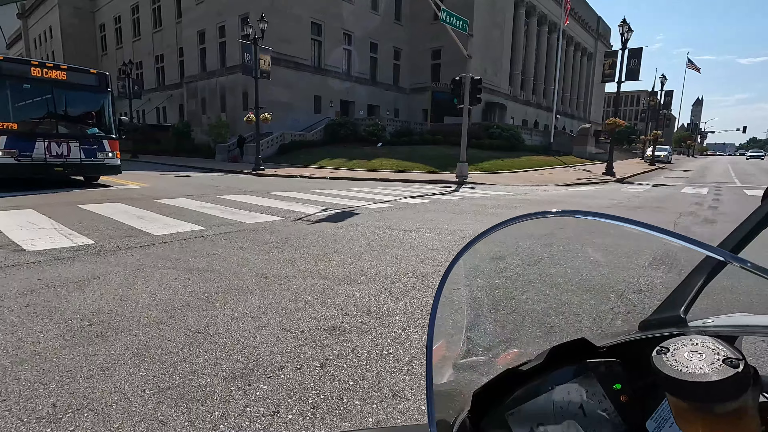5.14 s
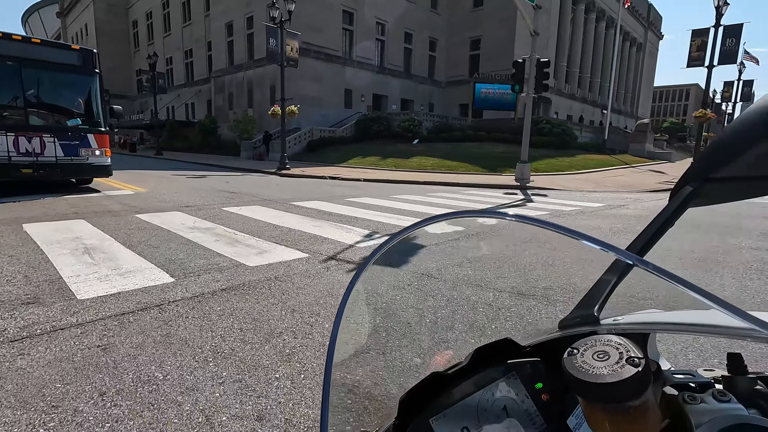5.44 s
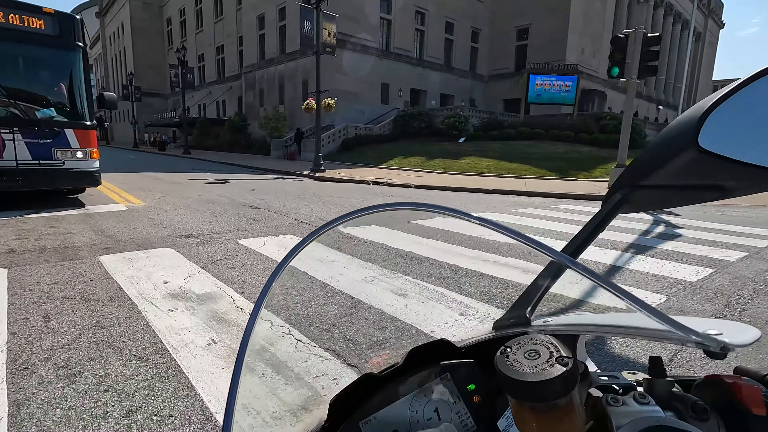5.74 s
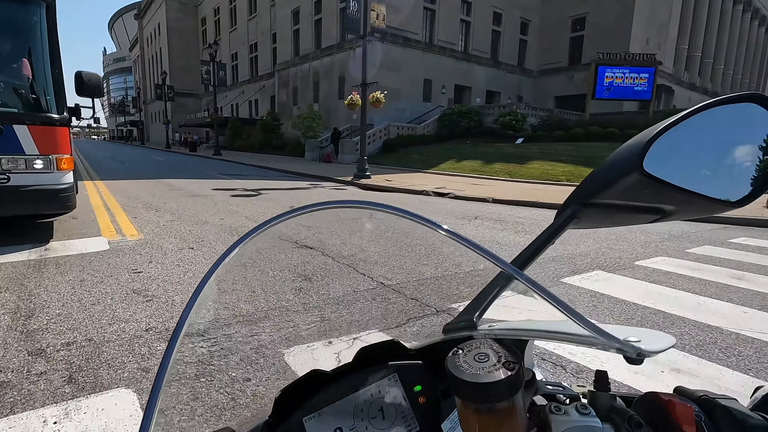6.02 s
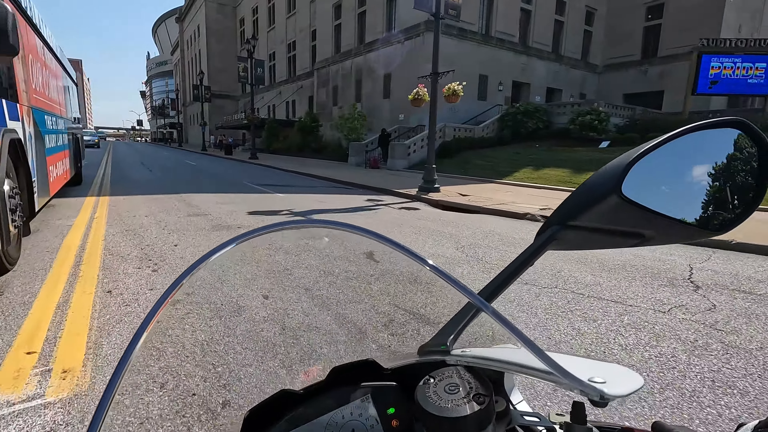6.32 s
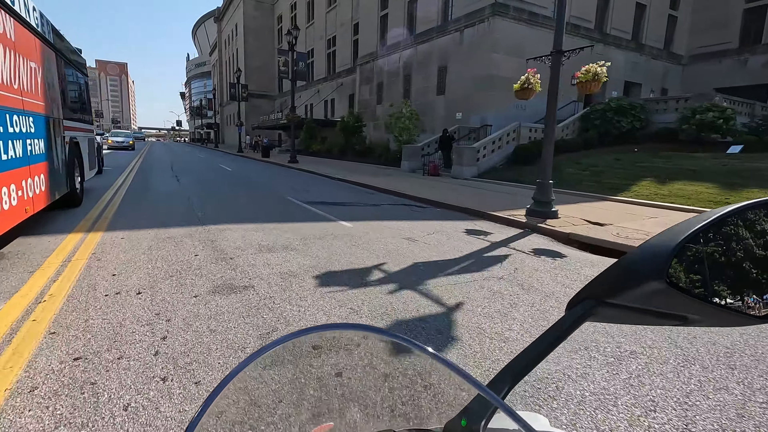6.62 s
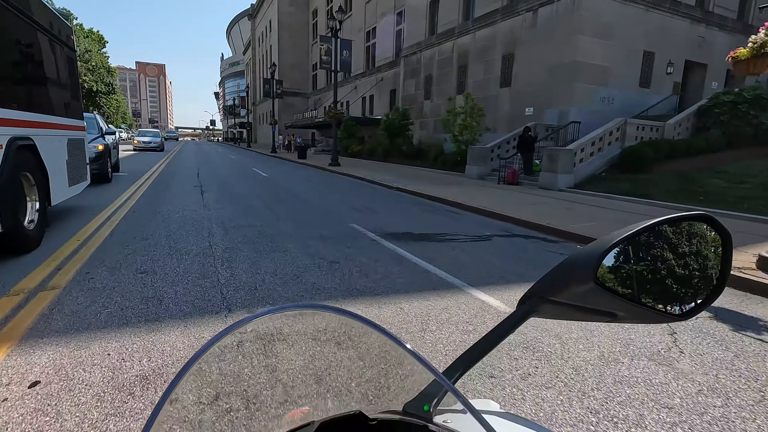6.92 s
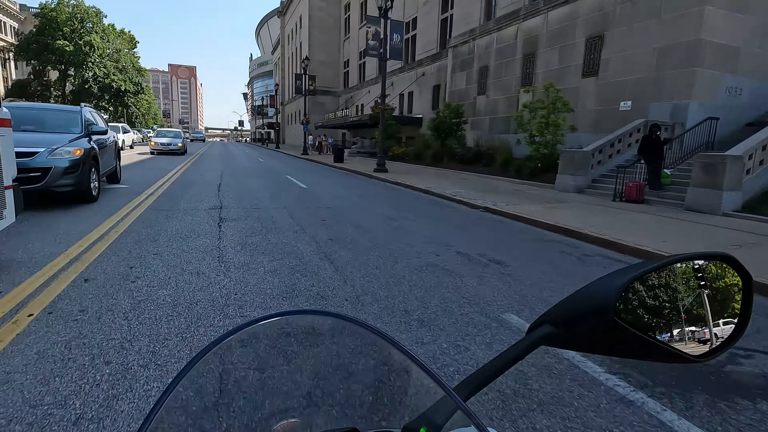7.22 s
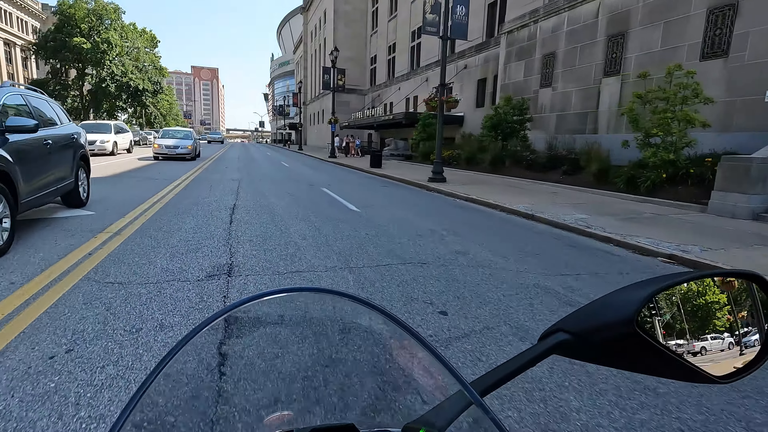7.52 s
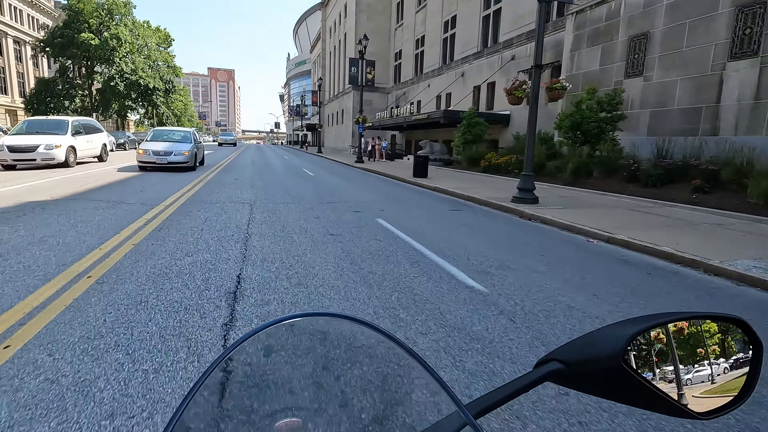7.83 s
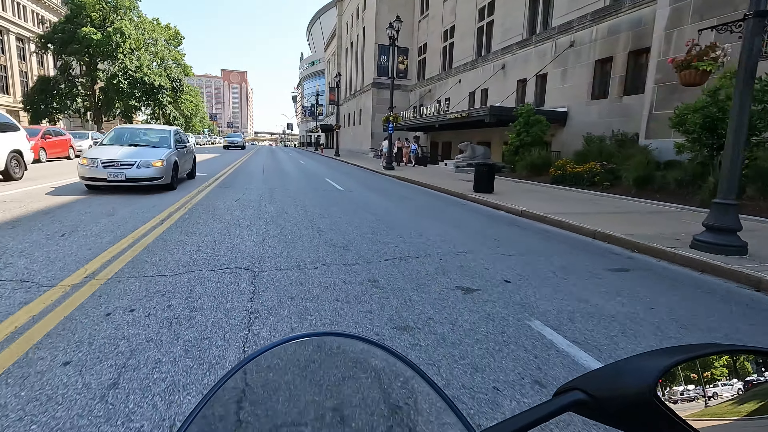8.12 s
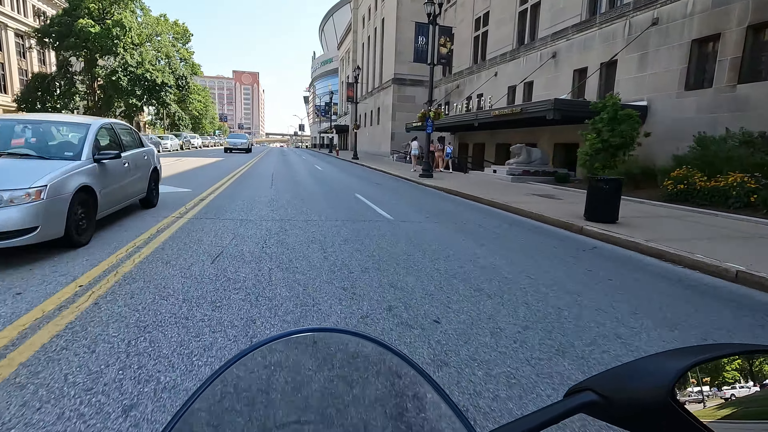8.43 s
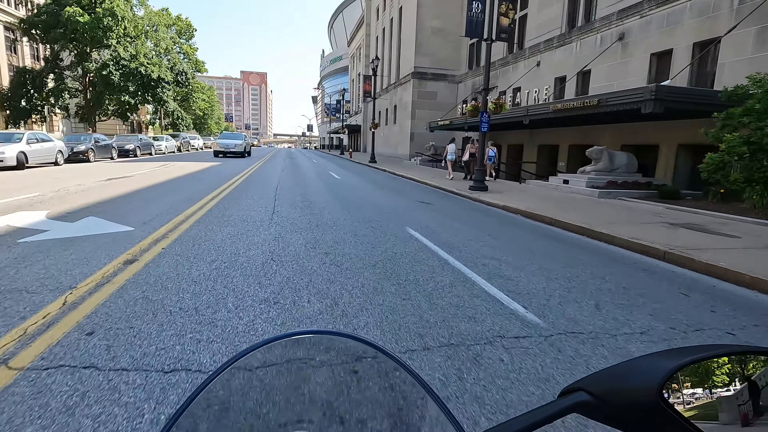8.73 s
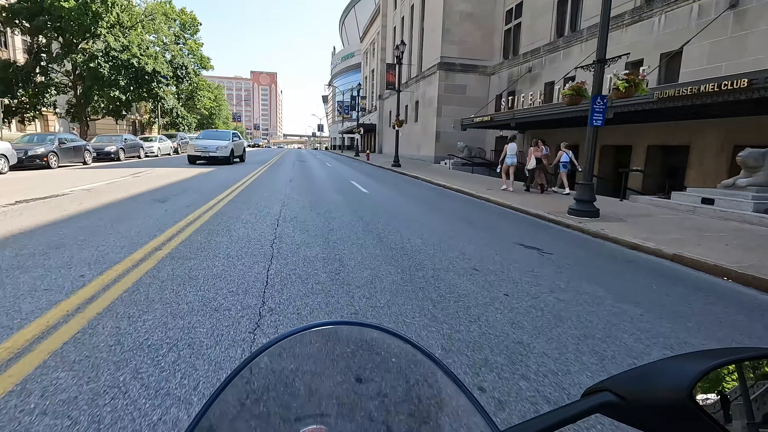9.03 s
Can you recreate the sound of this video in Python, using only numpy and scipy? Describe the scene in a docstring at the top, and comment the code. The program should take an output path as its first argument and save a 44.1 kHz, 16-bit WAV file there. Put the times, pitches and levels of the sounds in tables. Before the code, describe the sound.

From the seat of a motorcycle in city streets, the engine chugs at idle with a light mechanical chatter. The throttle opens and the throb becomes a higher, wavering drone. The bike creeps off and gathers speed, its growl rising as wind and tyre noise build beneath it. The pitch drops suddenly at a single gear change, then the engine pulls steadily again.

```python
"""A four-cylinder motorcycle with an uneven beat, heard from the rider's seat.
It idles, pulls away on a slipping clutch, gathers speed, shifts up once and drones on.
Puffs of gas make the exhaust pipe and airbox (the air intake's chamber) ring, while the valves
clatter, chirp and hiss in step. Wind and tyre roar grow with road speed.
One small tick comes from the handlebar near the start."""
import sys
import numpy as np
from scipy.fft import rfft, irfft, next_fast_len
from scipy.io import wavfile
from scipy.ndimage import uniform_filter1d, minimum_filter1d, map_coordinates

SR = 44100
rng = np.random.default_rng(int(sys.argv[2]) if len(sys.argv) > 2 else 0)


def log_audio(samples):
    """Write samples as a 16-bit WAV file to the path given in sys.argv[1]."""
    # one column per channel
    frames = np.atleast_2d(samples).T
    # limit to full scale, then quantise
    limited = np.clip(frames, -1, 1)
    pcm = np.round(limited * 32767).astype(np.int16)
    wavfile.write(sys.argv[1], SR, pcm)


N = 399987


def amp(db):
    """Turn decibels into a gain to multiply by."""
    return 10 ** (np.asarray(db) / 20)


def clock():
    """The time of every sample, in seconds."""
    return np.arange(N) / SR


def curve(rows):
    """Join (time, value) points with straight lines."""
    return np.interp(clock(), *np.transpose(rows))


def ramp(x, start, end):
    """0 at start, 1 at end, straight in between and flat outside."""
    return np.clip((x - start) / (end - start), 0, 1)


def steady(x):
    """Hold the average level at 1 but keep the quick beats."""
    size = SR // 6
    power = uniform_filter1d(uniform_filter1d(x * x, size), size)
    return x / np.sqrt(np.abs(power) + 1e-20)


def wobble(per_s):
    """A smooth curve through per_s random values a second."""
    return map_coordinates(rng.standard_normal(int(N * per_s / SR) + 4), [clock() * per_s])


def filtered(x, response):
    """Multiply each frequency in x by response(hz)."""
    size = next_fast_len(N + SR // 2)
    return irfft(rfft(x, size) * response(np.fft.rfftfreq(size, 1 / SR)), size)[:N]


def coloured(x, points):
    """Shape the tone of x with (pitch_hz, level_db) points, then steady its level."""
    pitch_hz, level_db = np.transpose(points)
    shape = lambda hz: amp(np.interp(np.log(hz + 1), np.log(pitch_hz), level_db, right=-120))
    return steady(filtered(x, shape))


def ring(x, notes, soft_hz):
    """Pulses, dulled above soft_hz, ring a body's natural notes at a steady level."""
    def response(hz):
        body = sum(gain * 1j * hz * width / (pitch ** 2 - hz ** 2 + 1j * hz * width)
                   for pitch, width, gain in notes)
        return body / (1 + 1j * hz / soft_hz) ** 2 / (1 + (hz / (2 * soft_hz)) ** 4)
    return steady(filtered(x, response))


def pulses(cycles, places, sizes):
    """A click each time the engine's count of cycles reaches one of the places."""
    at = np.interp(places.ravel(), cycles, np.arange(N))
    sizes = sizes.ravel() * (at > 0) * (at < N - 1)
    i = at.astype(int)
    late = at - i  # each click is shared between two samples
    return (np.bincount(i, sizes * (1 - late), N + 1) + np.bincount(i + 1, sizes * late, N + 1))[:N]


def chatter(cycles, noise_share, count=96, drift_cycles=36):
    """Tiny clicks that return every cycle, slowly changing in strength, mixed with plain noise."""
    places = np.arange(int(cycles[-1]) + 1)[:, None] + rng.random(count)
    strengths = uniform_filter1d(rng.standard_normal(places.shape), drift_cycles, axis=0)
    clicks = steady(pulses(cycles, places, strengths))
    return np.sqrt(1 - noise_share) * clicks + np.sqrt(noise_share) * rng.standard_normal(N)


def road_speed(start_s=4.3, gather_s=2.73):
    """0 standing still, 1 at full pace; the bike creeps at first."""
    return ramp(clock(), start_s, start_s + gather_s) ** 1.4


# The wind's low rumble: pitch_hz, level_db
WIND_TONE = [(8, -19), (28, -5), (55, -8.5), (110, -12.5), (250, -14), (500, -22.5), (1500, -80.5)]


def wind(breeze_db=-29.5, headwind_db=8, flutter_db=-1.8):
    """Air tumbles round the windscreen, buffeting harder as the bike speeds up."""
    level_db = breeze_db + headwind_db * road_speed() ** 2 + flutter_db * wobble(12)
    return amp(level_db) * coloured(rng.standard_normal(N), WIND_TONE)


# Tyres on asphalt: pitch_hz, level_db
TYRE_TONE = [(300, -8.5), (600, -6), (900, 1.5), (1150, 1.5), (1450, -11.5), (2000, -12.5), (2900, -12),
             (4000, -25.5), (6000, -32), (9000, -44), (15000, -52)]


def tyres(full_pace_db=-30.5):
    """The rolling tyres roar louder with road speed."""
    return amp(full_pace_db) * road_speed() * coloured(rng.standard_normal(N), TYRE_TONE)


def handlebar_tick(start_s=.136, level_db=-39, fade_s=0.056):
    """One small bright tick that dies away quickly."""
    age_s = clock() - start_s
    tone = [(2500, -43), (4000, -3.0), (5500, -13.0), (8400, -11.0), (11000, -17.5), (15500, -27)]
    fade = (age_s > 0) * amp(level_db - 60 * np.abs(age_s) / fade_s)
    return fade * coloured(rng.standard_normal(N), tone)


# The notes of the clutch plates: pitch_hz, width_hz, gain
CLUTCH_NOTES = [(911, 55, 0.97), (1004, 40, 0.37), (1706, 78, .42), (3296, 120, 0.16)]


def clutch(cycles, valve_force, start_s=4.35, end_s=6.8, fade_s=.4, level_db=-33.5):
    """While the clutch slips, the engine's knocks ring its plates."""
    slip = ramp(clock(), start_s, start_s + fade_s) * ramp(clock(), end_s, end_s - fade_s)
    knocks = chatter(cycles, noise_share=0.2) * (0.92 + valve_force)
    return amp(level_db) * slip * ring(knocks, CLUTCH_NOTES, soft_hz=6000)


# The valve movements in one engine cycle:
# place_cycles, length_s, revving_size, idle_size, revving_pitch_ratio, idle_pitch_ratio
VALVE_MOVES = [(.2, 0.0035, .15, 1.14, 0.85, 1.485), (0.308, 0.0076, 0.64, 0.43, 1.015, 1.5),
               (0.678, .003, 1, 0.084, 1.03, 0.35), (0.819, 0.0037, 1, 1.5, 1.06, 1.014)]


def valve_moves(cycles, cycles_per_s, above_idle):
    """Each valve movement is a short swell, once a cycle, with its own pitch ratio."""
    for place, length_s, rev_size, idle_size, rev_ratio, idle_ratio in VALVE_MOVES:
        offset_s = ((cycles - place + .5) % 1 - .5) / cycles_per_s  # time from the swell's middle
        size = rev_size * above_idle + idle_size * (1 - above_idle)
        swell = size * np.exp(-(offset_s / length_s) ** 2)
        yield offset_s, swell, rev_ratio * above_idle + idle_ratio * (1 - above_idle)


def valve_chirps(moves, above_idle, level_db, idle_hz=1130, revving_hz=1050):
    """Each valve lets through a few milliseconds of whistling air."""
    base_hz = idle_hz + above_idle * (revving_hz - idle_hz)
    whistle = sum(swell * np.sin(2 * np.pi * base_hz * ratio * offset_s + 0.56 * wobble(450))
                  for offset_s, swell, ratio in moves)
    return amp(level_db + 1.5 * wobble(25)) * whistle


# The engine's high hiss: pitch_hz, level_db
HISS_TONE = [(1400, -23), (1900, 0), (2350, -1), (2600, -2.5), (3120, -2), (3600, -10), (5000, -17),
             (5650, -15), (6300, -19), (8400, -25.5), (10000, -31.5), (12000, -37), (15500, -36.5)]


def valve_hiss(cycles, valve_force, level_db):
    """A hiss that swells with every valve movement."""
    return amp(level_db) * coloured(chatter(cycles, noise_share=0.76) * (1.6 + valve_force), HISS_TONE)


# The engine's metal case, pulling and idling: pitch_hz, level_db
PULLING_CASE_TONE = [(600, -17), (780, -7.5), (900, -2.5), (1100, -1.5), (1400, -11), (1580, -5),
                     (1730, -2.5), (1880, -18.5), (2300, -33)]
IDLE_CASE_TONE = [(440, -34), (750, -12), (817, -15.5), (870, -7.5), (1010, -11.5), (1080, -5), (1120, -7),
                  (1350, -16), (1730, -12), (1950, -31), (2200, -26), (2860, -39), (4840, -120)]


def valve_clatter(cycles, valve_force, pulling, level_db):
    """The valves' knocks sound through the engine's case."""
    knocks = chatter(cycles, noise_share=0.36) * (1 + valve_force)
    pull = np.sqrt(pulling) * coloured(knocks, PULLING_CASE_TONE)
    idle = np.sqrt(1 - pulling) * coloured(knocks, IDLE_CASE_TONE)
    return amp(level_db) * (pull + idle)


# The engine's rough edge: pitch_hz, level_db
RASP_TONE = [(550, -30.5), (660, -4), (735, 0), (820, -6.5), (1000, -23)]


def rasp(cycles, level_db):
    """A narrow, rough buzz in step with the engine."""
    return amp(level_db) * coloured(chatter(cycles, noise_share=0.23), RASP_TONE)


# The growl of air being sucked in: pitch_hz, level_db
INTAKE_TONE = [(330, -20.5), (430, 3), (480, -4.5), (540, 0), (600, 1), (660, -14), (800, -34.5)]


def intake(cycles, throb_db, growl_db):
    """The airbox sucks hardest once a cycle, making a deep throb and a pulsing growl."""
    suck = np.cos(2 * np.pi * (cycles - .45))
    throb = amp(throb_db + 1.8 * wobble(6.6)) * steady(suck)
    air = chatter(cycles, noise_share=0.11) * (1 + 0.44 * suck)
    return throb + amp(growl_db) * coloured(air, INTAKE_TONE)


# The gas puffs in one cycle (a negative size sucks): place_cycles, pull_size, idle_size, idle_scatter_db
GAS_PUFFS = [(0, 1.25, 0.34, 7.5), (0.347, 0.34, 0.2, -5), (0.381, 1.86, 0.63, 3.4), (0.6, .4, 0.04, 4),
             (0.7, -0.48, 0.061, 11.5)]
# The notes of the pipe and airbox, pulling and idling: pitch_hz, width_hz, signed_gain
PULLING_PIPE_NOTES = [(59, 17, 0.5), (81.8, 21, -0.54), (152, 40.2, 0.95), (184.8, 32.6, 0.75),
                      (297, 82, 0.73), (366, 53.8, -1.096)]
IDLE_PIPE_NOTES = [(60, 6.7, 1.4), (81, 19, -0.57), (146.4, 38, 1.43), (162, 40, -0.35), (270, 73, 0.61),
                   (330.7, 28.6, -1.29)]


def exhaust(cycles, pulling, chugging, boom_db, bark_db, jitter_cycles=.0026, scatter_db=.7):
    """Unevenly spaced puffs ring the pipe; at low engine speed their sizes turn lopsided."""
    place, pull_size, idle_size, idle_scatter_db = np.transpose(GAS_PUFFS)
    chance = rng.standard_normal((int(cycles[-1]) + 1, 2, len(place)))
    places = np.arange(len(chance))[:, None] + place + jitter_cycles * chance[:, 0]
    ride_size = pull_size + np.interp(places, cycles, chugging) * (idle_size - pull_size)
    pull = pulses(cycles, places, ride_size * amp(scatter_db * chance[:, 1]))
    idle = pulses(cycles, places, idle_size * amp(idle_scatter_db * np.tanh(chance[:, 1])))
    gas = np.sqrt(pulling) * ring(pull, PULLING_PIPE_NOTES, soft_hz=520)
    gas += np.sqrt(1 - pulling) * ring(idle, IDLE_PIPE_NOTES, soft_hz=467)
    boom = filtered(gas, lambda hz: 1 / (1 + (hz / 225) ** 12))  # low notes boom, the rest bark
    return amp(boom_db) * steady(boom) + amp(bark_db) * steady(gas - boom)


# How fast the engine runs (one cycle is two turns of its shaft): time_s, cycles_per_s
ENGINE_SPEED = [(0.0, 11.33), (0.147, 10.95), (0.744, 12.05), (1.297, 11.11), (1.845, 11.36),
                (2.041, 25.25), (2.284, 32.35), (2.641, 32.25), (3.072, 30.19), (3.461, 29.46),
                (3.843, 25.47), (4.423, 29.91), (4.896, 26.94), (5.373, 27.2), (5.966, 29.48),
                (7.436, 38.46), (7.781, 41.84), (8.018, 31.8), (8.305, 31.47), (9.07, 35.08)]
# The rider's throttle: time_s, opening (0 shut, 1 wide open)
THROTTLE_OPENING = [(1.78, 0.21), (1.93, 0.85), (2.3, 0.41), (3.4, 0.29), (3.95, 0.7), (4.5, 0.31),
                    (5.2, .33), (6.8, 0.42), (7.25, 0.83), (7.8, .88), (7.84, 0), (7.97, 0.035), (8.1, .3),
                    (8.35, .3), (8.85, 0.67)]
# How loud each engine sound is: base_db, high_revs_adds_db, pulling_adds_db, full_throttle_adds_db
BOOM_LEVELS = (-14, 2.5, -1.3, 2.25)
BARK_LEVELS = (-19.5, -4, 6, 2)
THROB_LEVELS = (-44, -4, 11, 11.5)
GROWL_LEVELS = (-35, 1.2, -2.5, 16)
RASP_LEVELS = (-41, 12, -0.5, 4.5)
CLATTER_LEVELS = (-30.5, 4, -1.57, -0.1)
HISS_LEVELS = (-43, 4.5, -0.28, 1.8)
CHIRP_LEVELS = (-26, 1.5, -4, 0.6)


def motorcycle(idle_per_s=12.9, revving_per_s=23.5, smooth_per_s=29.76, high_per_s=38.8):
    """Engine speed sets the beat of every part; speed and throttle set how loud each is."""
    cycles_per_s = curve(ENGINE_SPEED)
    throttle = curve(THROTTLE_OPENING)
    cycles = np.cumsum(cycles_per_s) / SR + .0018 * cycles_per_s  # running count, 1.8 ms ahead
    above_idle = ramp(cycles_per_s, idle_per_s, revving_per_s)
    pulling = above_idle * ramp(throttle, 0, .3)
    chugging = np.clip(0.23 * (smooth_per_s - cycles_per_s), 0, .85)
    revs = ramp(cycles_per_s, idle_per_s, high_per_s) ** 2
    moves = list(valve_moves(cycles, cycles_per_s, above_idle))
    valve_force = sum(swell for _, swell, _ in moves)

    def level_db(levels):
        base_db, revs_db, pulling_db, throttle_db = levels
        return base_db + revs_db * revs + pulling_db * pulling + throttle_db * throttle

    return (exhaust(cycles, pulling, chugging, level_db(BOOM_LEVELS), level_db(BARK_LEVELS))
            + intake(cycles, level_db(THROB_LEVELS), level_db(GROWL_LEVELS))
            + rasp(cycles, level_db(RASP_LEVELS))
            + valve_clatter(cycles, valve_force, pulling, level_db(CLATTER_LEVELS))
            + valve_hiss(cycles, valve_force, level_db(HISS_LEVELS))
            + valve_chirps(moves, above_idle, level_db(CHIRP_LEVELS))
            + clutch(cycles, valve_force))


def scene():
    """Bike, tyres, wind and tick together in one channel."""
    return (motorcycle() + tyres() + wind() + handlebar_tick())[None]


def record(dry, start_s=.034, peak_limit=0.83, top_hz=15700):
    """The sound switches on, its tallest peaks are turned down and the highest treble is cut."""
    x = dry[0] * ramp(clock(), start_s, start_s + 0.0014)
    size = SR // 200
    needed_gain = np.minimum(1, peak_limit / (np.abs(x) + 1e-9))
    smooth_gain = uniform_filter1d(minimum_filter1d(needed_gain, size), size)
    return filtered(x * smooth_gain, lambda hz: hz < top_hz)[None]


dry = scene()
out = record(dry)
log_audio(out)
```